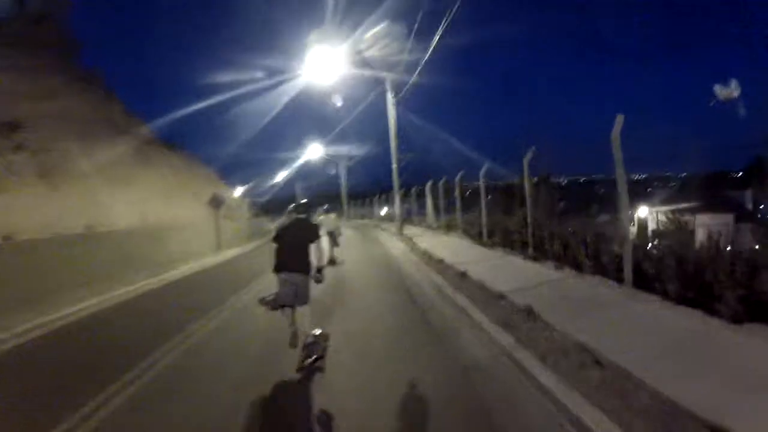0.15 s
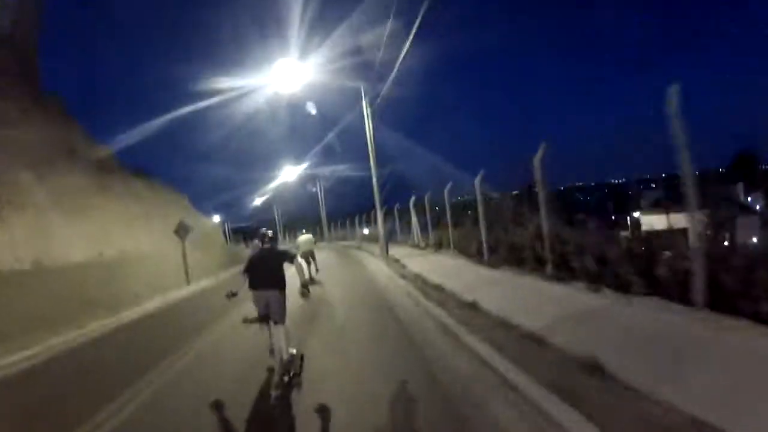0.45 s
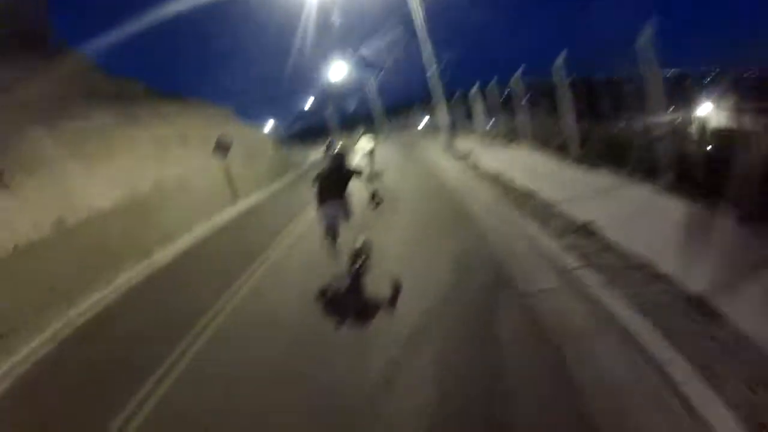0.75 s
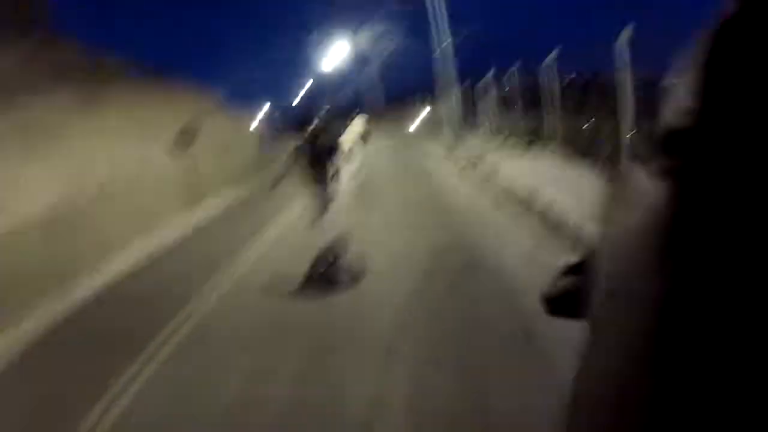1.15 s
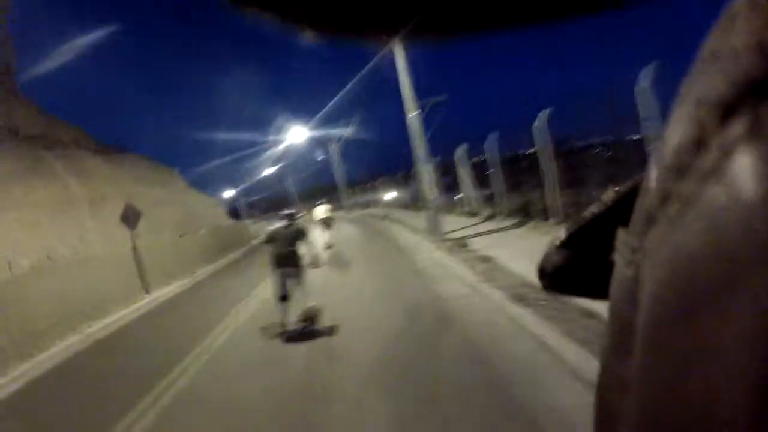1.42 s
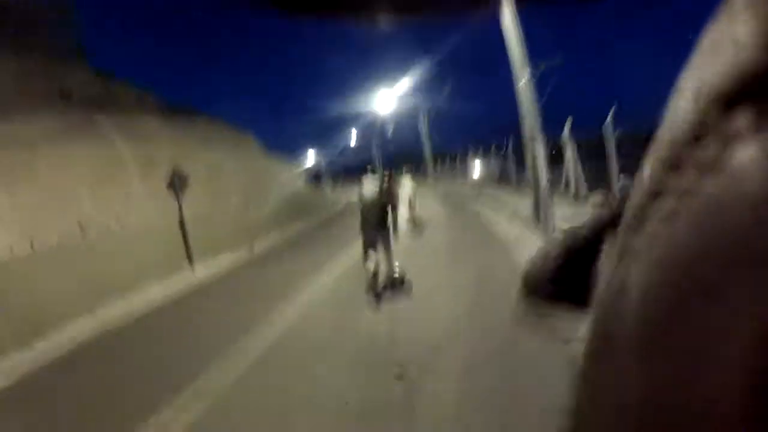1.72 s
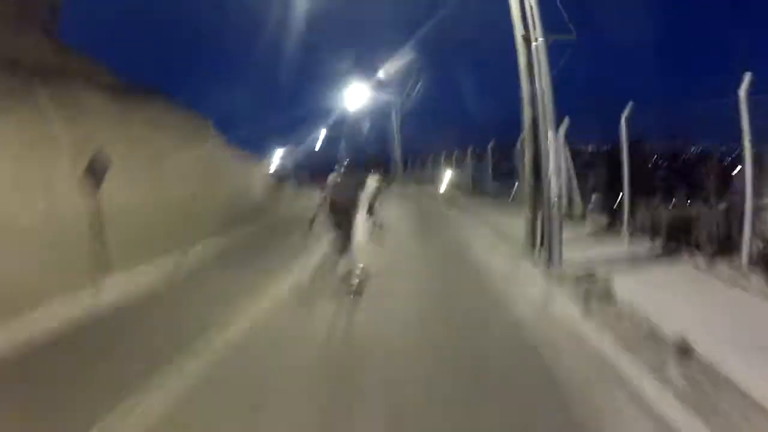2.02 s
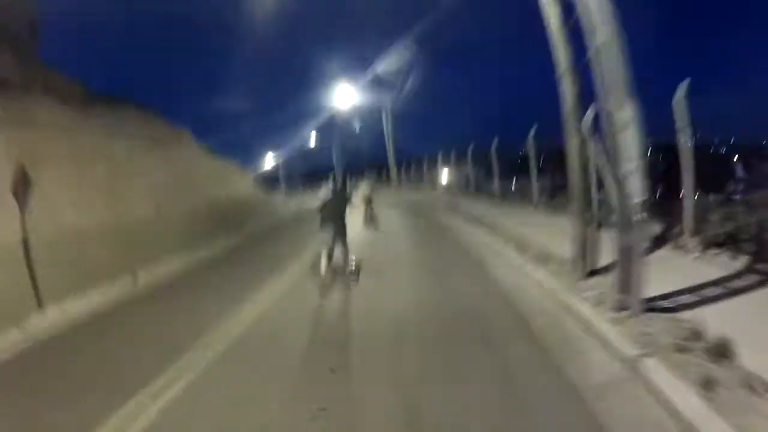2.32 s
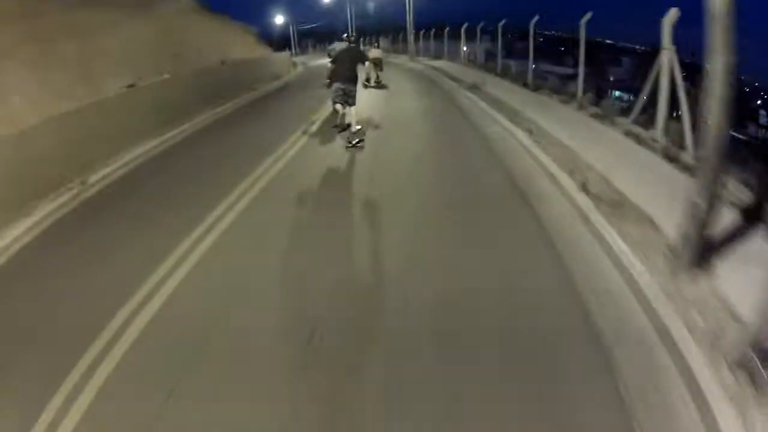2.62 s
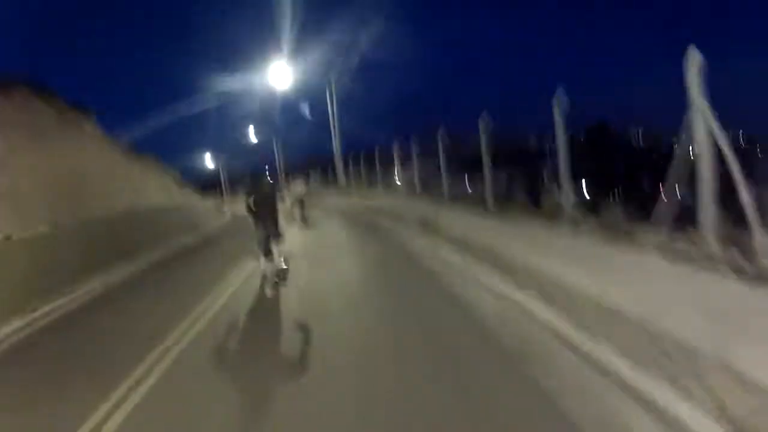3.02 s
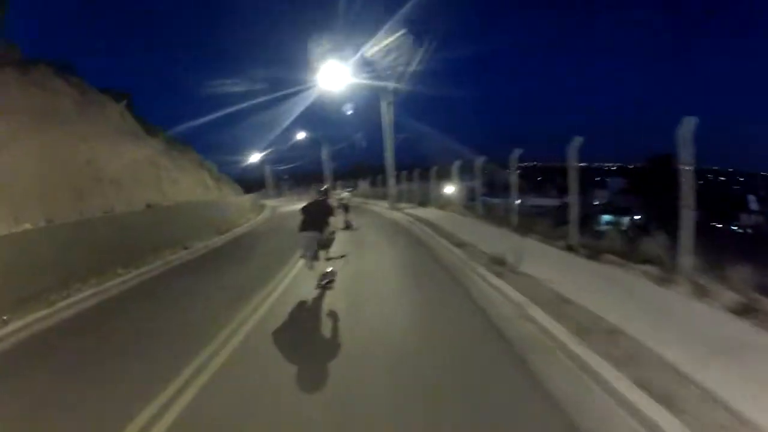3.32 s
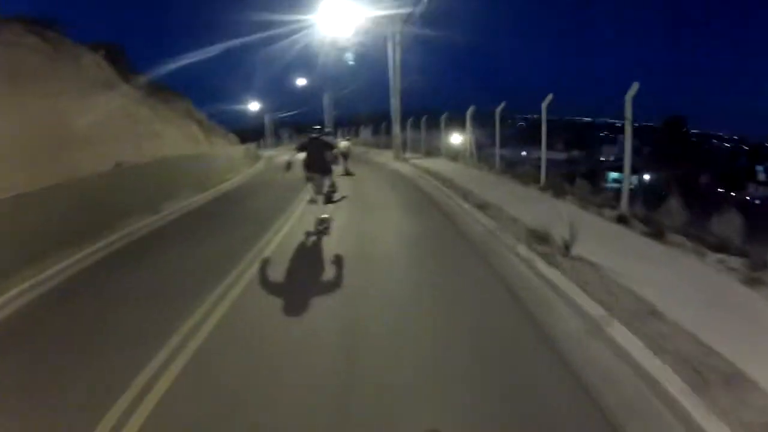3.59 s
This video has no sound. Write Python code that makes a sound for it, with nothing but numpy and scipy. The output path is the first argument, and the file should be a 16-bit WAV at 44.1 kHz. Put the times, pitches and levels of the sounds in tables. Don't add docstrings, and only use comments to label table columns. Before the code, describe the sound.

Hard plastic knocks and ticks on a camera housing over low wheel rumble and buffeting wind.

```python
import sys
import numpy as np
from scipy import signal
from scipy.io import wavfile
from scipy.ndimage import uniform_filter1d

SR = 44100
rng = np.random.default_rng(int(sys.argv[2]) if len(sys.argv) > 2 else 0)


def persist_wave(psi):
    counts = np.round(np.clip(psi, -1, 1) * 32767).astype(np.int16)
    wavfile.write(sys.argv[1], SR, np.atleast_2d(counts).T)


def boost(x):
    u = np.asarray(x, float) / 20
    return 10 ** u


N = 165375


def level(x, rms_db):
    return x * boost(rms_db) / np.sqrt(np.mean(x ** 2))


def band(x, hz, width_hz):
    return signal.lfilter(*signal.iirpeak(hz, hz / width_hz, fs=SR), x)


def steep_band(x, hz, width_hz, second_width_hz):
    return band(band(x, hz, width_hz), hz, second_width_hz)


def ring(x, modes):
    out = 0
    for k, (hz, width_hz, db) in enumerate(modes):
        out = out + (-1) ** k * boost(db) * steep_band(x, hz, width_hz, 0.8 * width_hz)
    return out


def walk(rate_hz):
    hold = int(SR / rate_hz)
    steps = np.repeat(rng.standard_normal(N // hold + 1), hold)
    slewed = uniform_filter1d(uniform_filter1d(steps, hold), hold)
    return 0.76 * slewed[:N]


def grit(spread_db):
    grain_db = spread_db * np.minimum(rng.exponential(size=N), 6.5)
    return rng.standard_normal(N) * boost(grain_db)


def add(out, start_s, x):
    i = int(start_s * SR)
    out[i:i + len(x)] += x[:N - i]


# start in seconds, peak in dB, pitch in Hz, hold in ms.
KNOCKS = [(0.09, -10.5, 435, 6), (0.265, -4.5, 468, 1.9), (0.272, 3.5, 534, 1.2), (0.335, -7.5, 534, 2.1),
          (0.35, -10.5, 540, 4.2), (0.562, -14, 463, 5.2), (0.842, -4.5, 534, 1.2), (0.849, 0, 490, 1.3),
          (0.875, -13, 580, 2.3), (0.9948, -9, 500, 4.6), (1.146, -16, 653, 3.5), (1.165, -7, 575, 4.3),
          (1.792, -5, 400, 0.8), (2.037, -7, 367, 3.7), (2.092, -13.5, 1025, 1.1), (2.105, -7, 523, 3.3),
          (2.885, -10.5, 485, 3.2), (3.024, -8, 513, 4.1), (3.055, -10, 476, 3.5), (.617, -17, 586, 2.2),
          (2.214, -15.5, 614, 2.5), (2.955, -13.5, 545, 2.6), (3.627, -19.5, 557, 2), (3.726, -17, 596, 2),
          (1.3122, 4.5, 422, .8), (1.244, -10.5, 300, 3.4)]
# start in seconds, peak in dB, pitch in Hz, hold in ms, 60 dB decay in seconds.
SLAPS = [
    (0.9344, 7, 538, 1.65, 0.005),
    (.9366, 1, 765, 4.9, 0.004),
    (0.9423, -4.5, 520, .8, 0.019),
    (1.3134, 3, 509, 2.2, 0.0048),
    (1.3152, 0.5, 680, 3.36, 0.011),
    (1.3162, 0, 346, 4.7, 0.0095),
    (1.325, -7, 450, 5.2, 0.0091),
    (1.335, -12.5, 450, 3.3, 0.028),
    (1.3818, -2.5, 523, 2.1, 0.015),
    (2.276, -22.5, 966, 2.1, 0.021),
]
# start in seconds, peak in dB, pitch in Hz, hold in ms, 60 dB
# decay in seconds.
TAPS = [(.198, -23, 900, 1, 0.013), (0.226, -19.5, 1000, 1.5, 0.011), (.386, -24, 930, 1, 0.012),
        (.45, -28.5, 990, 1, 0.017), (.59, -30, 1000, 1, 0.014), (.617, -34, 1950, 2, .02),
        (.633, -30.5, 1960, 2.2, 0.017), (.647, -34, 2060, 1, .015), (1.006, -23, 1965, 2.4, 0.015),
        (1.252, -32, 2100, 1, .012), (1.759, -27, 3810, 1.5, .012), (1.766, -21.5, 985, 1, 0.018),
        (2.057, -35, 2700, 1, 0.013), (2.143, -21, 940, 1, .02), (2.257, -32, 2950, 2, .015),
        (2.954, -21, 880, 1.1, 0.022), (3.003, -22, 950, 2, .02), (3.034, -39, 2750, 1, .015),
        (3.099, -26, 900, 1, 0.018), (3.118, -28, 960, 1.6, 0.014), (1.3805, -19.5, 2700, 0.89, 0.0098),
        (1.3803, -13, 983, .8, 0.019), (2.0437, -26.5, 2620, 1.8, 0.014), (2.091, -18.5, 1770, 0.87, .01),
        (3.001, -29, 3080, 1.7, 0.011), (1.358, -52, 2800, 2, .02)]


def knocks():
    knock_gain_db, knock_t60_s = -2, 0.017
    rows = [(s, db + knock_gain_db, hz, hold_ms, knock_t60_s, -4.5, -1, 0.0015)
            for s, db, hz, hold_ms in KNOCKS]
    rows += [(*row, -14.5, 1, 0.0006) for row in [*SLAPS, *TAPS]]
    out, t = np.zeros(N), np.arange(2600) / SR
    for start_s, db, hz, hold_ms, t60_s, second_db, push, attack_s in rows:
        attack = np.sin(np.pi / 2 * np.minimum(t / attack_s, 1)) ** 2
        decay = boost(-60 * np.maximum(t - hold_ms / 1000, 0) / t60_s)
        tone = 0
        for ratio, mode_db in [(1, 0), (1.39, second_db), (1.703, -15.5)]:
            tone = tone + boost(mode_db) * np.sin(2 * np.pi * hz * ratio * t)
        add(out, start_s, push * boost(db) * attack * decay * tone)
    return out


# start in seconds, peak in dB, pitch in Hz.
THUDS = [
    (0.926, -30, 130),
    (0.9367, -3, 138),
    (1.194, -14, 118),
    (1.3142, -11, 290),
    (2.67, -9.5, 111),
    (2.692, -12.5, 108),
    (3.077, -5.5, 162),
]


def thuds():
    out, t = np.zeros(N), np.arange(2600) / SR
    for start_s, db, hz in THUDS:
        env = np.sin(np.pi * np.minimum(t * hz / 0.96, 1))
        add(out, start_s - 0.002, -boost(db) * env * np.sin(2 * np.pi * hz * t))
    return out


# start in seconds,
# peak in dB, pitch in Hz, 60 dB decay in seconds.
TICKS = [(0.1986, -24, 2140, 0.013), (0.2668, -19.5, 1740, 0.017), (0.2738, -21.5, 1550, 0.013),
         (0.332, -25, 2890, 0.018), (0.341, -29, 1950, 0.027), (0.4247, -26.5, 2130, 0.012),
         (0.562, -27.5, 2800, 0.024), (0.5668, -18, 2850, 0.013), (0.616, -31, 1990, 0.032),
         (0.632, -33, 1930, 0.022), (0.85, -15, 1960, 0.01), (1.0059, -24, 2000, 0.021),
         (1.147, -13, 1830, 0.013), (1.4114, -28.5, 2830, 0.029), (1.5548, -24.5, 3000, 0.011),
         (1.595, -19.5, 2700, 0.0081), (1.7407, -22, 3780, 0.0087),
         (2.0433, -27, 1900, 0.016), (2.143, -29, 1670, 0.011), (2.172, -29, 2640, 0.023),
              (2.2036, -31, 2940, 0.016), (2.225, -26, 4530, 0.012), (2.2517, -25, 2930, 0.022),
              (2.2765, -24, 2930, 0.012), (2.35, -30, 2900, 0.02), (2.8841, -24.5, 1560, 0.018),
              (2.956, -25.5, 1960, 0.01), (3.0019, -23.5, 2400, 0.014), (3.018, -25, 2670, 0.014),
              (3.056, -22, 2130, 0.015), (3.0633, -26, 2600, 0.012), (3.082, -33, 4630, 0.013),
              (3.0985, -23, 1780, 0.0092), (3.7263, -30.5, 1900, 0.027),
         (.187, -43, 2300, 0.0099), (.2608, -31, 2800, .01), (0.452, -27, 2300, .012),
           (0.854, -25, 2420, .015), (.9946, -28, 2040, .012), (1.1907, -26.5, 3710, 0.031),
           (1.745, -29, 3000, .015), (1.7589, -30, 3000, .01), (1.768, -28, 2300, .015),
           (1.79, -26.5, 3000, 0.022), (2.1241, -30, 3800, .01), (2.1577, -27.5, 2070, .015),
           (2.286, -29, 4330, 0.011), (2.72, -40, 2540, 0.0088), (2.833, -28, 3000, 0.0079),
           (2.892, -31, 3000, .012), (3.07, -25.5, 3200, .02), (3.6644, -32, 2500, .01),
           (3.687, -31, 2500, .01)]
# start in seconds, peak in dB, pitch in Hz, 60 dB decay in seconds.
CHATTER = [
    (0.9351, 6.5, 3170, 0.015),
    (0.9392, -1.5, 3420, 0.0097),
    (1.3122, -2, 2880, 0.013),
    (1.3156, 2.5, 3340, 0.014),
    (1.3185, 2.5, 2530, 0.013),
    (1.3218, -11, 2530, 0.015),
    (1.3802, -16, 1500, 0.008),
    (2.092, -1, 2520, 0.0098),
    (3.7445, -18.5, 2970, 0.019),
]


def ticks():
    rows = [(*row, -0.5) for row in TICKS]
    rows += [(*row, -9) for row in CHATTER]
    out, t = np.zeros(N), np.arange(1500) / SR
    for start_s, db, hz, t60_s, ring_db in rows:
        noise = rng.standard_normal(len(t))
        wide = level(band(band(noise, 1.16 * hz, 4000), 1.97 * hz, 5900), -6.5)
        mode = level(band(noise, hz, 310), -4.0)
        crack = boost(-9.5) * wide + boost(ring_db) * mode
        add(out, start_s - 0.0005, boost(db - 60 * t / t60_s) * crack)
    return out


# start in seconds, length in seconds, level in dB, brightness in dB, swell in seconds.
RUBS = [(0.168, 0.14, -49.5, -21, 0.0087), (0.316, 0.18, -55, -16, 0.0087),
        (0.559, 0.069, -47.5, -3, 0.0046), (0.838, 0.072, -38, -3.5, .004),
        (0.953, 0.068, -39.5, -14.5, 0.014), (1.051, 0.2, -46.5, 10.5, 0.16),
        (1.213, 0.13, -43, -3.5, 0.043), (1.417, .07, -60, 2.5, 0.0027), (1.744, 0.085, -41.5, 3.5, 0.0055),
        (2.09, 0.26, -49, -6, 0.0066), (2.577, 0.18, -58.5, 12.5, 0.055), (2.908, 0.29, -50.5, -8, 0.022),
        (3.005, .09, -47, -24, .005), (3.72, .04, -50, -15, 0.011)]
# pitch in Hz, width in Hz, level in dB.
SQUEAK = [(3780, 280, 7), (4940, 9300, -7), (2650, 550, -1)]
# pitch in Hz, width in Hz, level in dB.
SHELL = [(1380, 2200, -13), (2000, 630, 4), (2700, 980, 3.5), (3880, 490, -8.5), (4940, 1800, -7.5)]


def rubs(t):
    grain_db, fade_s = 4, 0.043
    scratch = grit(grain_db) * boost(9.7 * walk(120) + 2.0 * walk(40.5))
    body = level(band(band(scratch, 843, 350), 590, 420), 7.5)
    dull = level(ring(scratch, SHELL), 0) + body
    thin = level(ring(grit(grain_db) * boost(2 * walk(49.9)), SQUEAK), 0)
    out = 0
    for start_s, length_s, db, bright_db, swell_s in RUBS:
        rise, fall = (t - start_s) / swell_s, (start_s + length_s - t) / fade_s
        env = np.clip(np.minimum(rise, fall), 0, 1)
        out = out + env * boost(db) * (dull + boost(bright_db) * thin)
    return out


# pitch in Hz, width in Hz, level in dB.
BODY = [(237, 149, 3.5), (356.3, 183, -0.5), (491, 171, 2.5), (655.4, 177, -1.5), (733.3, 158, -3),
        (975, 270, -49)]


def wheels(roll_db):
    bumps = walk(35.01)
    road = grit(2.95) * boost(0.89 * bumps)
    rumble = level(ring(road, BODY), -26) * boost(roll_db)
    fine_road = grit(2.3) * boost(2.5 * bumps + 0.25 * walk(60))
    hiss = level(ring(fine_road, SHELL), -50) * boost(0.24 * roll_db)
    return rumble + hiss


# frequency in Hz, level in dB per Hz.
WIND = [(20, 0), (40, -11.5), (70, 4), (120, -1.5), (220, -2.5), (350, -9), (600, -27.5), (1000, -73)]


def wind(gust_db):
    curve_hz, curve_db = np.transpose(WIND)
    puff = walk(14)
    out = 0
    for hz in 22 * 2 ** np.arange(0, 5.6, 0.5):
        band_db = np.interp(np.log(hz), np.log(curve_hz), curve_db)
        flicker_db = 3.0 * puff + 1.16 * walk(15)
        noise = steep_band(rng.standard_normal(N), hz, hz / 2.68, hz / 1.52)
        out = out + boost(band_db + flicker_db) * noise
    return level(out, -23.5) * boost(gust_db)


# start in seconds, depth in dB, hold in seconds, recovery in seconds.
DUCKS = [
    (0.937, -10, 0.046, 0.044),
    (1.017, -10, 0.057, 0.11),
    (1.314, -24, 0.078, 0.11),
]


def duck(t):
    attack_s, gain_db = 0.0029, 0
    for start_s, depth_db, hold_s, recovery_s in DUCKS:
        fall = np.clip((t - start_s) / attack_s, 0, 1)
        recovery = np.clip(1 - (t - start_s - hold_s) / recovery_s, 0, 1)
        gain_db = gain_db + depth_db * fall * recovery
    return boost(gain_db)


# time in seconds, gust in dB, rolling in dB.
RIDE = [(0, 3, 4.5), (.2, -3.5, 6.5), (.4, -3, 2.5), (.7, -3.5, -0.5), (.8, -4, -3), (.9, 3.5, 0.5),
        (1.2, 2.5, 1), (1.55, 2.5, -0.5), (1.75, 5, 0.5), (1.95, 0, 2.5), (2.15, 4.5, 4), (2.45, -4, 0.5),
        (2.68, 4.5, -3.5), (2.82, -6, 3), (3.05, 0.5, 2.5), (3.35, -3, -1.5), (3.75, 1, 4)]


def scene():
    t = np.arange(N) / SR
    ride_s, gust_db, roll_db = np.transpose(RIDE)
    glove = knocks() + thuds() + ticks() + rubs(t)
    bed = wheels(np.interp(t, ride_s, roll_db)) + wind(np.interp(t, ride_s, gust_db))
    return (glove + bed * duck(t))[None]


def roll_off(x):
    return signal.sosfilt(signal.butter(12, 16270, fs=SR, output="sos"), x)


def record(dry):
    alias_hz, top_hz, clip = 5420, 15250, 1.04
    x = signal.sosfilt(signal.butter(6, alias_hz, fs=SR, output="sos"), dry)
    x = signal.resample_poly(x, 40, 147, axis=1)
    x = np.clip(x, -clip, clip)
    held = np.repeat(x, 4, axis=1)
    x = signal.resample_poly(held, 147, 160, axis=1)[:, :N]
    mix = signal.sosfilt(signal.cheby1(12, 1, top_hz, fs=SR, output="sos"), x)
    return roll_off(mix)


dry = scene()
out = record(dry)
persist_wave(out)
```